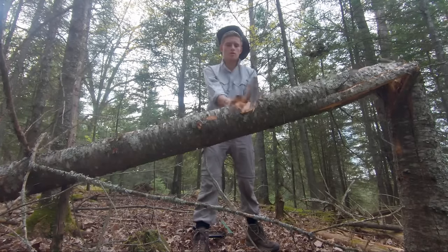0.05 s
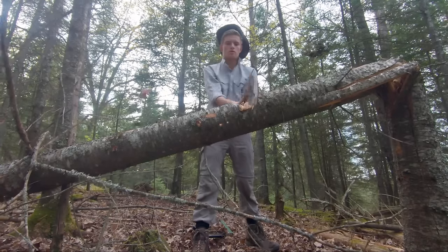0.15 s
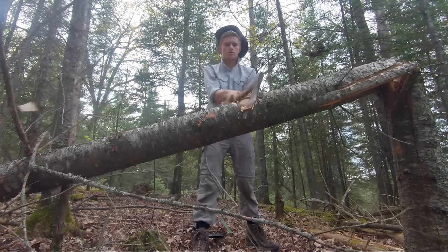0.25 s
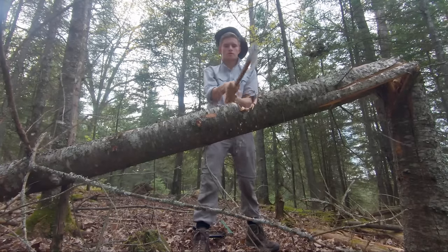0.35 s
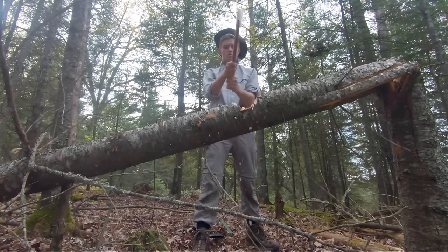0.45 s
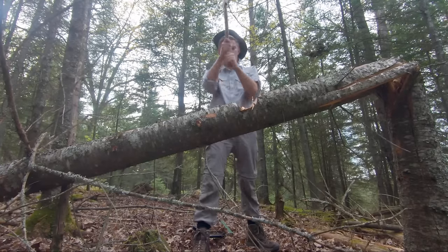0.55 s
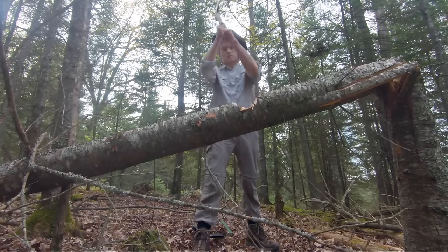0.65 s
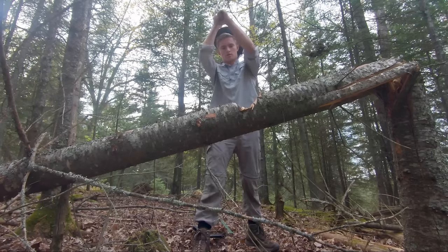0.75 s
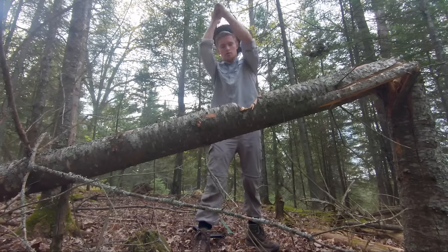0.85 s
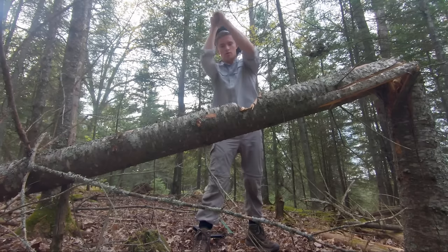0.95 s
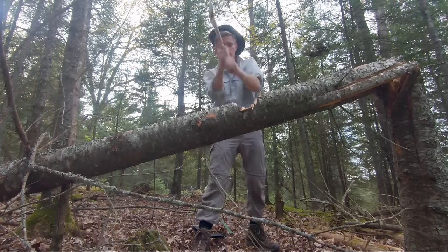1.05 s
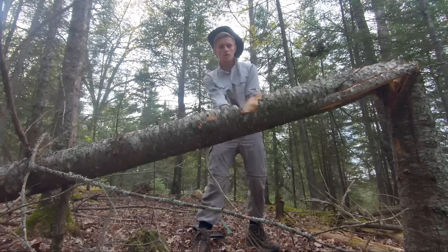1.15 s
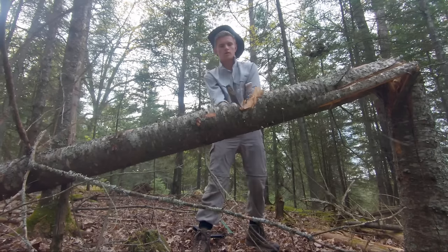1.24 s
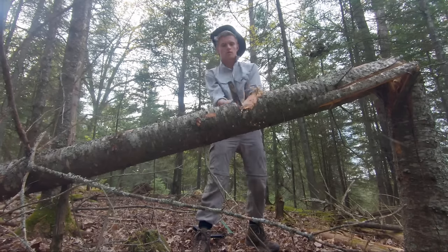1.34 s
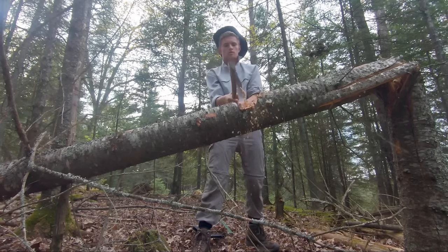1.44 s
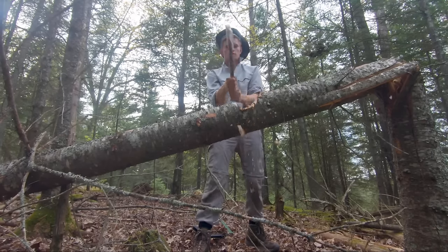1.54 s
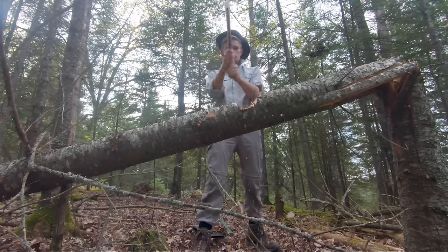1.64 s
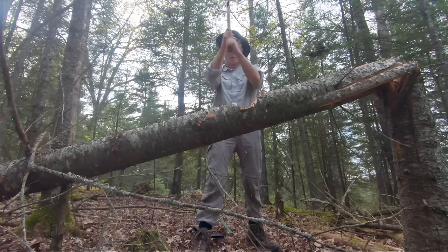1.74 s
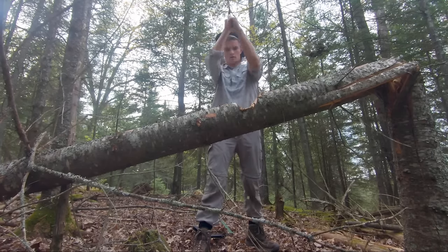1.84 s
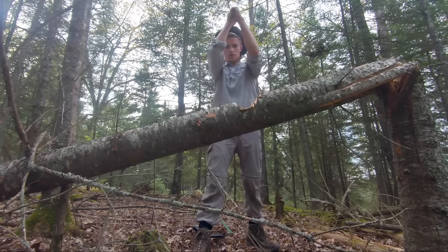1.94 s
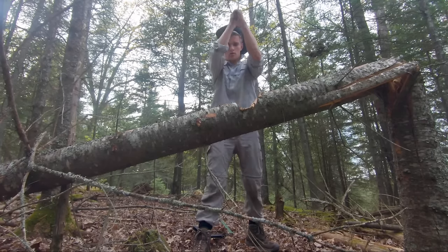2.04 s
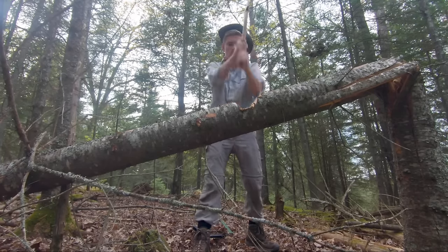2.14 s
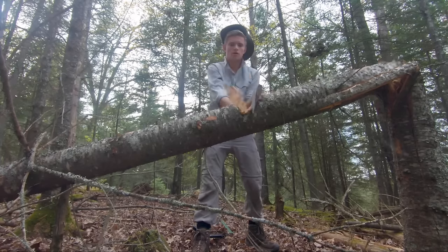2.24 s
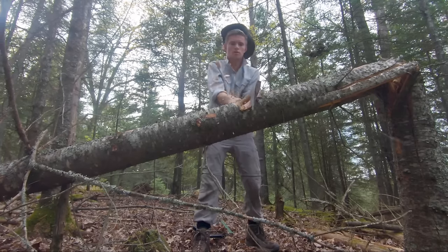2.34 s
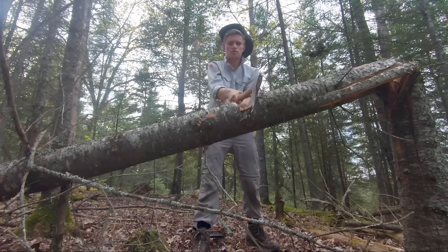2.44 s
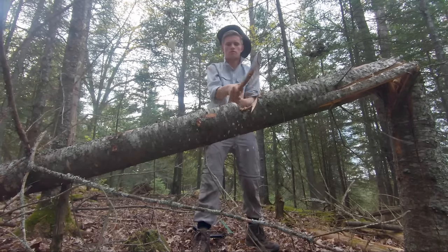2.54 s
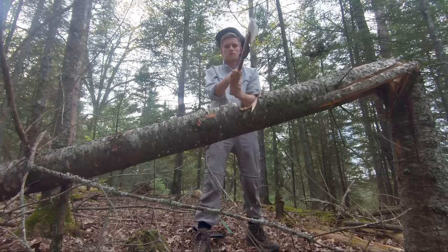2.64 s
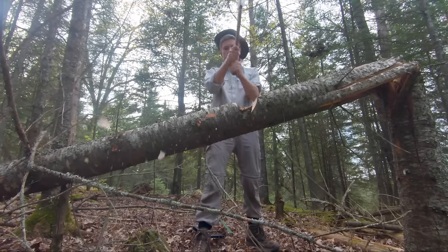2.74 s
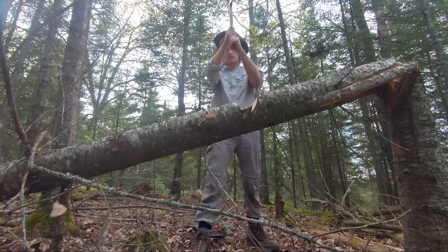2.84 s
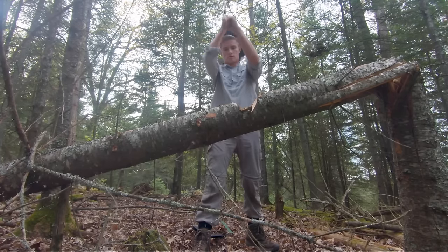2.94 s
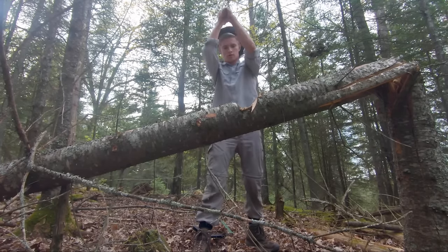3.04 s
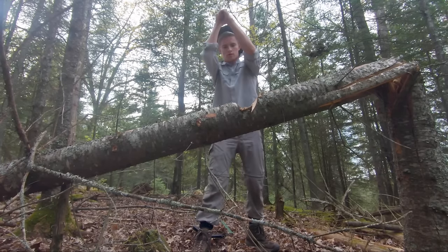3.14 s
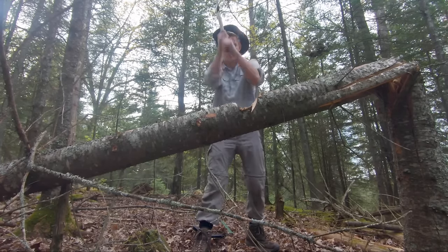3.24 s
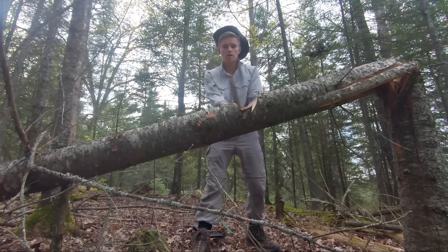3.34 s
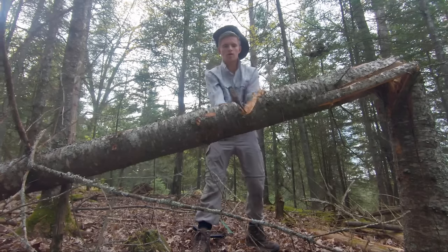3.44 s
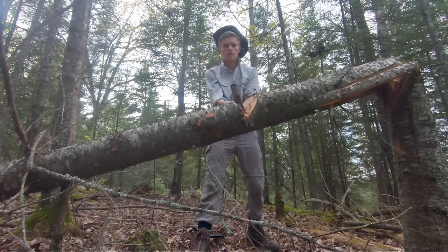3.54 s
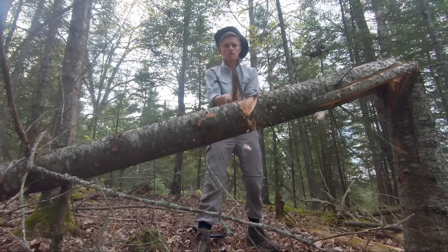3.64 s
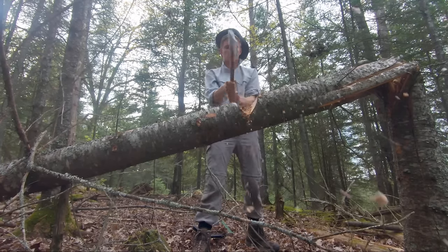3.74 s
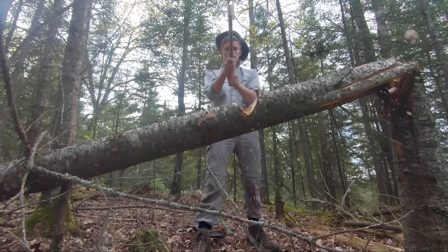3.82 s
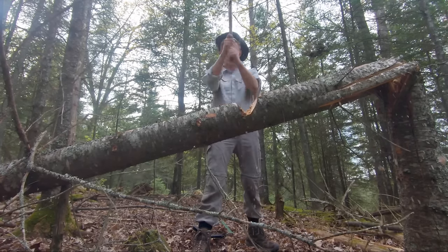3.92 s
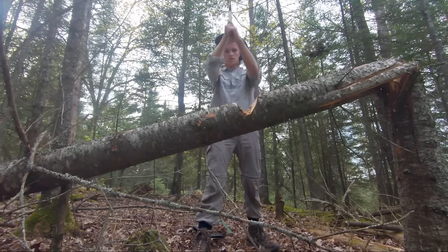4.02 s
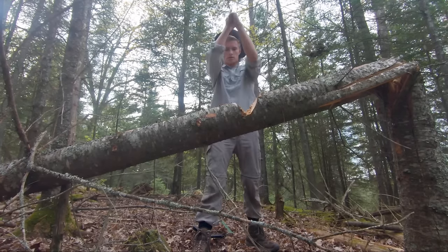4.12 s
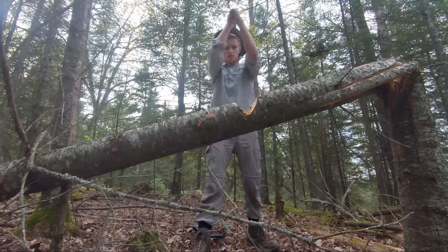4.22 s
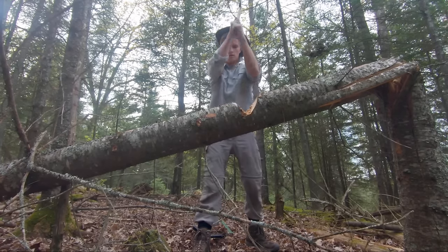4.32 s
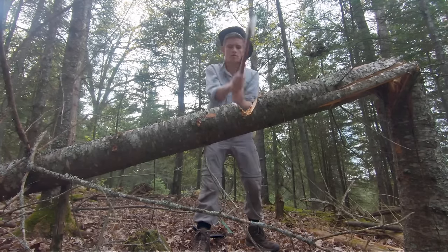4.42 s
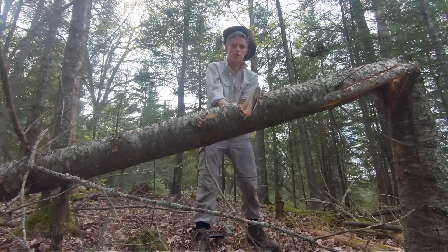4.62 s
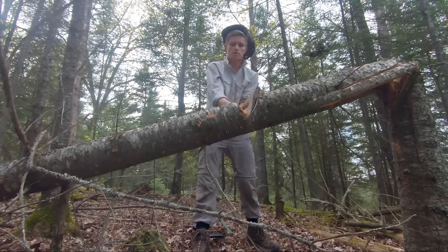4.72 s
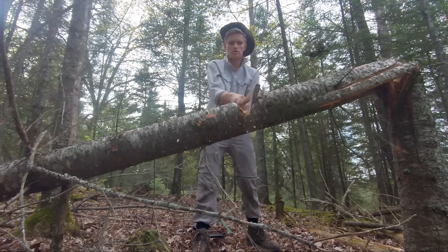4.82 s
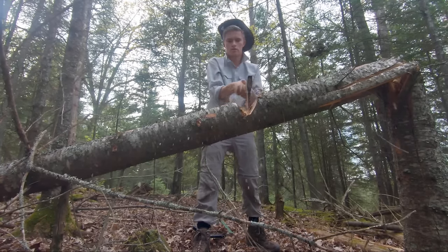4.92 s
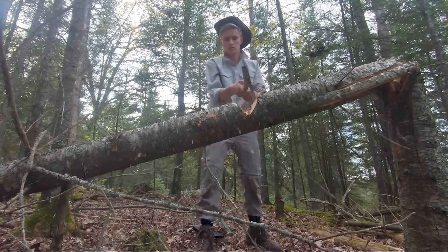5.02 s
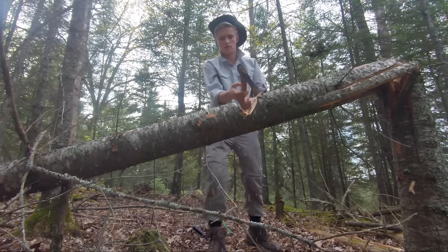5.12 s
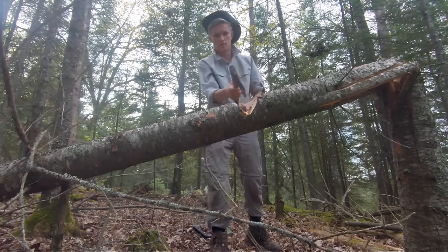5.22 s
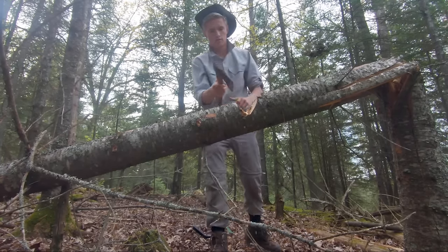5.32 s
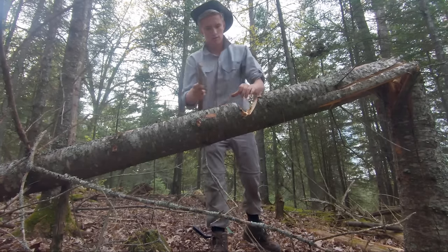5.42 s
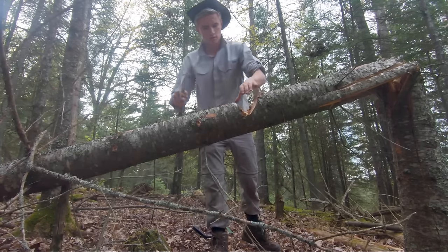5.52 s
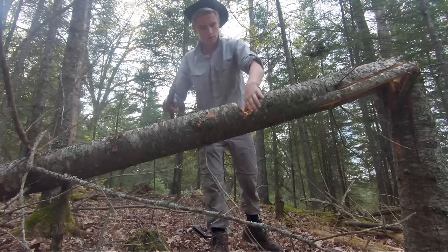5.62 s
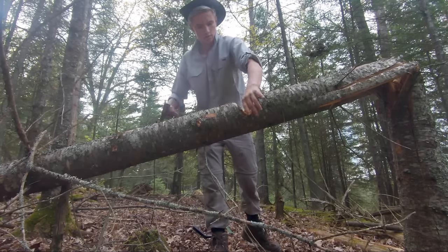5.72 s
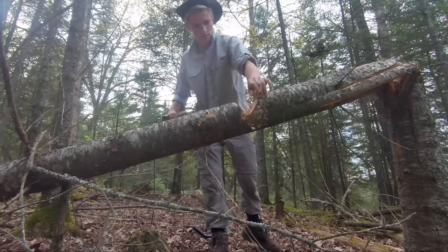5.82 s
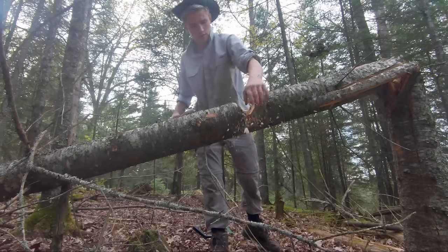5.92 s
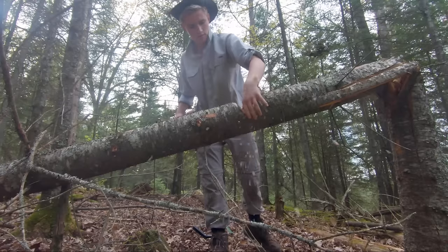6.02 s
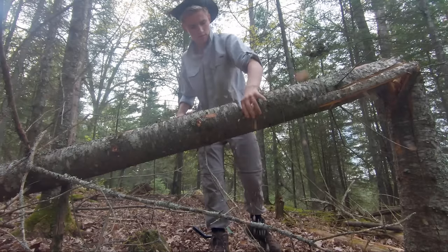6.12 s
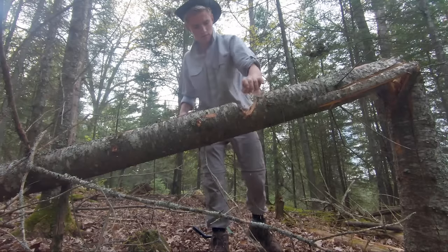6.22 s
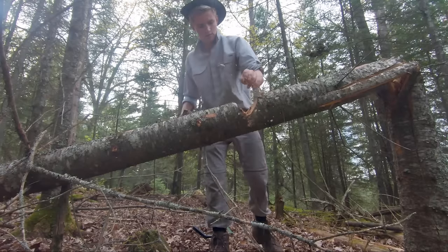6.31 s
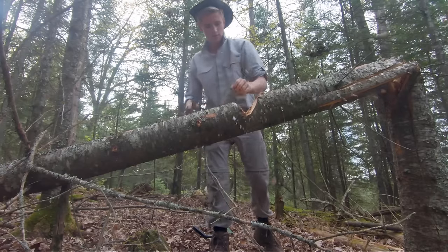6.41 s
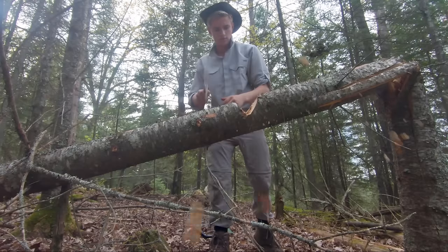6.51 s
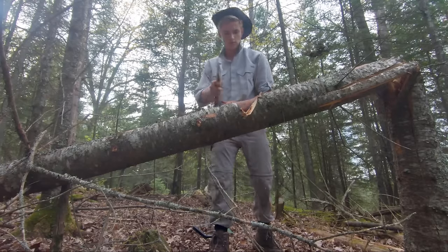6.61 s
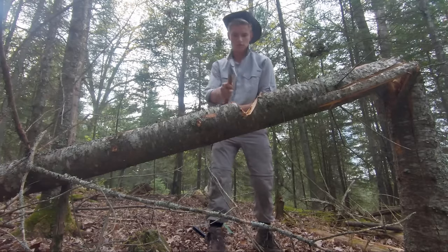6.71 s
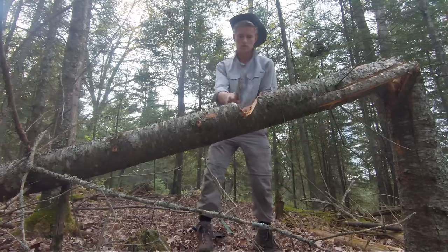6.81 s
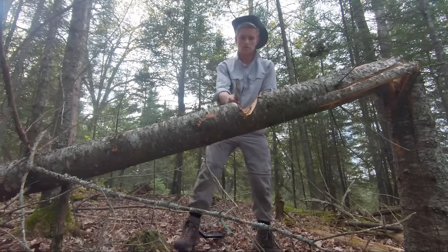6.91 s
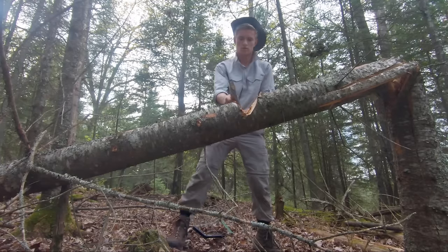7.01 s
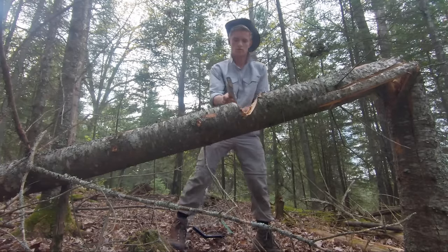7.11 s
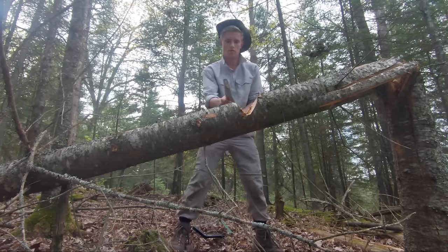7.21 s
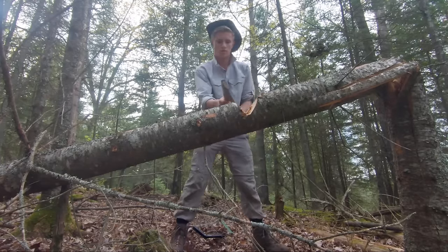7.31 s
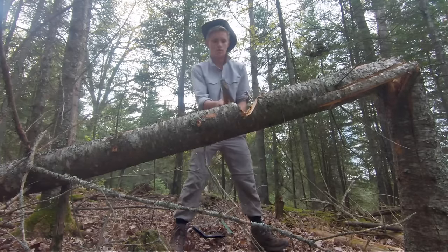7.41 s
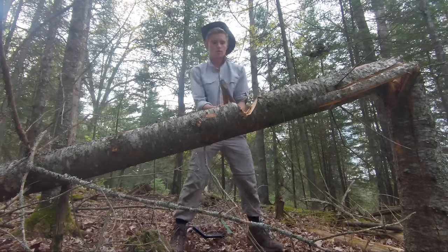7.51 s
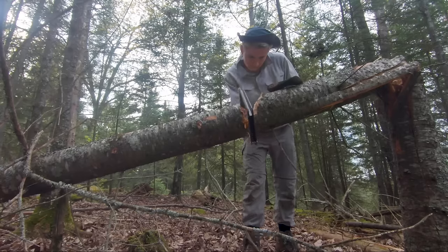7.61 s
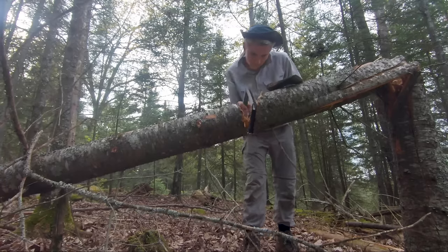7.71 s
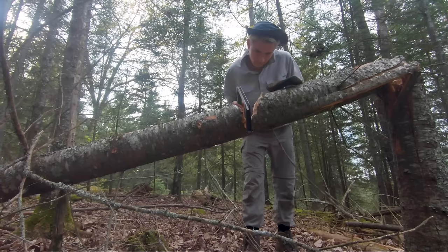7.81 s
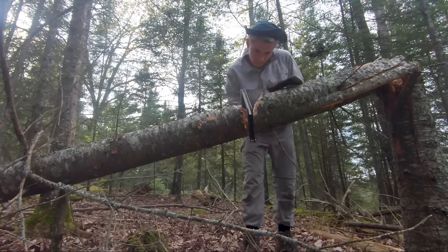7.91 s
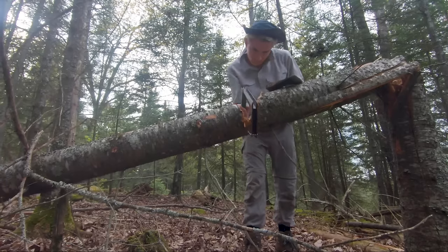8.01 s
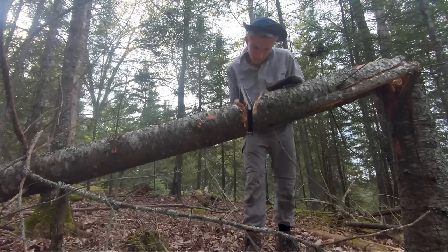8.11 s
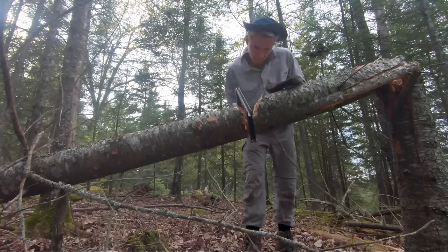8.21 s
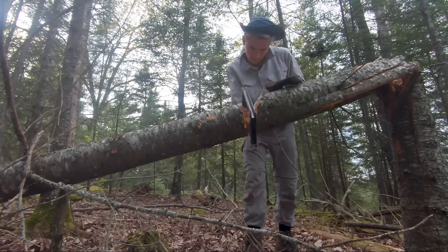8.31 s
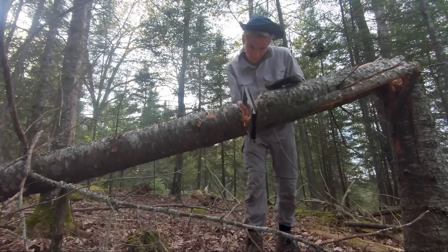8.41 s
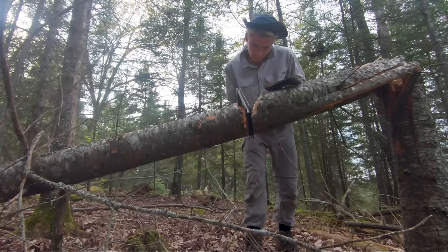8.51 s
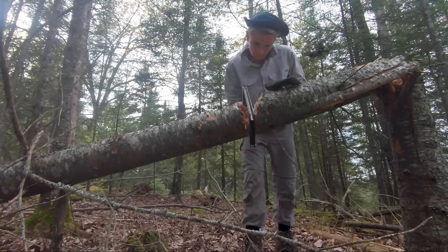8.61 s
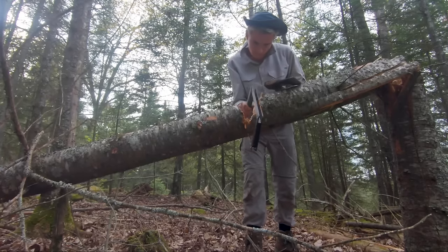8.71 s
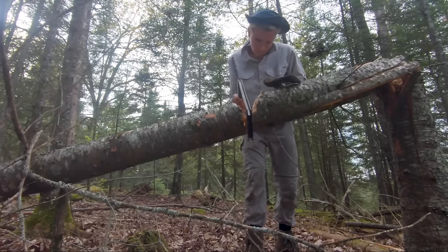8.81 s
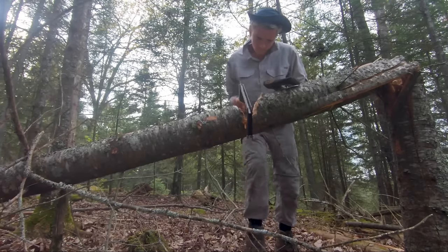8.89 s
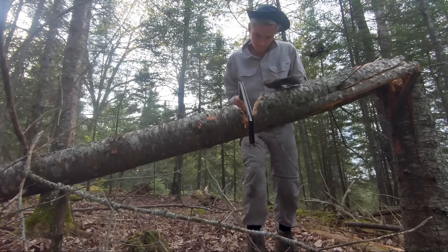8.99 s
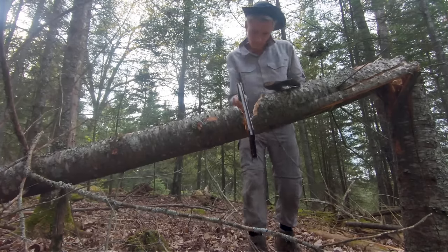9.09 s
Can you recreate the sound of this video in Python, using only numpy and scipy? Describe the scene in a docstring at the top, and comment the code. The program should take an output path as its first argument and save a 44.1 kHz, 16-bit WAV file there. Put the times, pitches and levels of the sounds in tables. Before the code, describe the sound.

A quiet forest with a soft airy hush and low wind rumble, puffing on the microphone now and then. At 0.1 s a hatchet bites into a fallen trunk with a bright, somewhat lighter crack; stronger, fuller chops follow at 1.2, 2.3, 3.4 and 4.5 s. Each is a sharp splintering hit with a hollow woody knock sinking into a low boom, then a brief diffuse echo among the trees. Chips tick and patter afterwards, and cloth and leaves rustle with the swings. A faint bird note sounds near 1 s. From 5 to 7.5 s there is only rustling, small ticks, light knocks at 6.3 and 6.9 s, a dry snap at 6.6 s and thin distant chirps. From 7.6 s to the end at about 9 s, a hand saw rasps in quick push-pull strokes, about five or six per second, gritty with slight blade ring and squeaks, over two faint knocks.

```python
"""A forest hush and a rumbling breeze come first; then a hatchet bites five times into a fallen trunk. Each
blow is torn-fibre noise through log resonances, a sinking knock and boom, and banded noise as echo. Two light
knocks follow. Chips tick as ringing noise bursts, cloth and leaves rustle as uneven noise, and a piece of wood
snaps as decaying sines. A hand saw starts on the cut: noise pulsed at a tooth rate; twice it catches in the cut
and jolts the log like a light knock. A far bird whistles in gliding sines, and puffs of low noise are wind on
the microphone."""
import sys
import numpy as np
from scipy import signal
from scipy.fft import rfft, irfft, next_fast_len
from scipy.io import wavfile
from scipy.ndimage import uniform_filter1d

SR = 44100
rng = np.random.default_rng(int(sys.argv[2]) if len(sys.argv) > 2 else 0)


def inscribe(sig):
    """Save sig as 16-bit PCM at rate SR to the path in sys.argv[1].

    A 1-D sig is mono; a 2-D sig holds one channel per row.
    Samples are clipped to [-1, 1] before scaling.
    """
    pcm = np.round(np.clip(np.atleast_2d(sig).T, -1, 1) * 32767)
    wavfile.write(sys.argv[1], SR, pcm.astype(np.int16))


N = 403515
TIME = np.arange(N) / SR   # seconds

# Far forest hush. Each row: frequency in Hz, relative density in dB per Hz.
HUSH_SPECTRUM = [(35, -20.5), (60, -10), (98, -1.5), (176, 7), (579, -18), (749, -8.5), (1010, -17),
                 (1860, -14.5), (2090, -24), (3760, -18.5), (10300, -26), (13900, -43.5), (16000, -59.5)]
# Wind noise on the microphone. Each row: frequency in Hz, relative density in dB per Hz.
WIND_SPECTRUM = [(15, -4.5), (35, -0.5), (55, -5.5), (90, -14), (180, -18.5), (400, -67)]
# Course of the breeze. Each row: time in seconds, relative level in dB.
BREEZE_COURSE = [(0.0, -52.5), (2.37, -44), (2.68, -61), (3.21, -56), (7.06, -65.5), (8.0, -71),
                 (9.15, -73)]
BREEZE_GAIN_DB, FLUTTER_DB, FLUTTER_PER_S = 1.5, 5.5, 19   # gain and random unsteadiness
# Single puffs of wind. Each row: start in seconds, length in seconds, relative level in dB.
WIND_PUFFS = [(1.857, .17, -33.5), (2.02, 0.18, -39), (2.836, 0.057, -32), (3.209, 0.096, -31.5),
              (4.401, 0.079, -34), (4.8, .1, -43.5), (5.987, .14, -35), (6.264, 0.062, -38.5),
              (7.02, 0.05, -41)]
# Bird notes. Each row: start in seconds, length in seconds, start pitch in Hz, end pitch in Hz, level in dB.
BIRD_NOTES = [(1.0, .15, 3900, 3880, -60), (6.475, .055, 5800, 4400, -56), (6.52, .085, 4400, 4200, -60),
              (6.8, .04, 3800, 3200, -54), (7.09, .03, 3800, 3300, -55), (7.125, .03, 3700, 3150, -54),
              (7.28, .06, 5000, 5500, -58), (7.44, .06, 5800, 4500, -56)]
# Arm swings, steps and scuffs that stir cloth and leaves. Each row: start in seconds, length in seconds,
# where it peaks (0-1), body level in dB, crispness level in dB.
MOVEMENTS = [(0.034, 0.11, 0.08, -53, -50.5), (0.613, 0.031, 0.3, -50, -43), (1.738, 0.56, 0, -49.5, -49),
             (2.691, 0.78, 0.26, -49, -51), (2.94, 0.043, 0.42, -39, -46), (3.523, 0.21, 0, -48.5, -43.5),
             (3.903, 0.058, .4, -43.5, -45), (3.93, 0.68, 0.26, -51, -49), (4.109, 0.093, 0.47, -45, -41.5),
             (5.026, .36, 0.71, -45.5, -47), (5.306, 0.46, 0.17, -56.5, -60.5),
             (5.73, .14, 0.91, -53, -70.5), (6.141, 0.22, 0.05, -49, -46.5), (6.311, .11, 0.87, -56, -49),
             (6.446, 0.17, 0.02, -67, -59), (6.671, 0.14, 0.28, -46.5, -42), (6.775, .33, 0.69, -51.5, -51),
             (7.158, 0.62, 0.1, -56.5, -55)]
# Soft body of the rustle. Each row: frequency in Hz, relative density in dB per Hz.
RUSTLE_BODY_SPECTRUM = [(180, -36), (300, -1), (437, -5), (904, 0), (1350, -3.5), (1970, -2), (3590, -1),
                        (6000, -14.5), (7800, -36), (13200, -120)]
# Crisp part of the rustle. Each row: frequency in Hz, relative density in dB per Hz.
RUSTLE_CRISP_SPECTRUM = [(2350, -40), (4000, -13), (7100, -12), (8650, -10.5), (13900, -20), (14900, -36),
                         (16000, -32.5)]
# Short bursts within the rustle: rate, decay time, size against the steady rub.
CRINKLES_PER_S, CRINKLE_S, CRINKLE_SIZE = 45, .003, 1.05
# Shower of fine chips after a blow: time to its peak, steepness of its swell, crispness against its body.
SHOWER_PEAK_S, SHOWER_POWER, SHOWER_CRISP_DB = .27, 1.39, -4.5
# Loudest chips landing and twigs cracking. Each row: time in seconds, relative peak in dB, centre in Hz.
CHIP_TICKS = [(0.327, -24, 800), (0.404, -25.5, 1850), (1.41, -27, 930), (2.234, -37, 3800),
              (2.391, -24, 2110), (2.736, -32, 2040), (2.907, -31, 2120), (3.026, -31, 3460),
              (3.242, -34.5, 2920), (3.915, -34, 2270), (3.994, -32, 950), (4.776, -32.5, 2170),
              (5.218, -33, 3800), (5.273, -27, 3650), (5.638, -40.5, 3200), (6.092, -42, 4480),
              (6.163, -32.5, 3210), (6.251, -30.5, 4300), (6.337, -39, 1280), (6.358, -39, 4000),
              (6.629, -31, 5060), (6.64, -31.5, 3240), (6.682, -29.5, 2520), (6.693, -28, 5800),
              (6.724, -23.5, 11430), (6.741, -27.5, 3400), (6.757, -29.5, 1450), (6.939, -36, 2720),
              (7.079, -35, 5100), (7.536, -41, 820), (8.397, -32, 1650)]
SNAP_S = 6.6127   # when a dry piece of wood snaps
# Modes of the snapping wood. Each row: frequency in Hz, level in dB, decay time to -60 dB in seconds.
SNAP_MODES = [(1210, -21, .044), (1400, -30, .015), (2600, -28, .004), (4100, -14, .003), (5600, -13, .003)]
# Saw strokes, push and pull in turn. Each row: start in seconds, end in seconds, relative level in dB,
# where the pressure peaks (0-1), treble in dB, blade ring in dB, log drone in dB.
SAW_STROKES = [(7.579, 7.674, -26.5, 0.24, -10, -5, -60), (7.681, 7.881, -33.5, 0.43, -6, -14, -67),
               (7.848, 8.022, -30.5, 0.65, -5, -0.5, -61), (8.059, 8.216, -38.5, 0.55, 1, -10, -70),
               (8.199, 8.385, -31.5, 0.61, -5, -8, -46), (8.42, 8.592, -36, 0.49, -5, -20, -59),
               (8.595, 8.749, -33, .65, -6.5, -3, -43), (8.807, 8.957, -30.5, 0.6, -4, -12, -52.5),
               (8.94, 9.16, -32.5, 0.6, -1.5, -5, -42)]
DRONE_SWELL_POWER = 0.17   # the log takes up the drone early in a stroke and holds it
# Sound of the cut. Each row: frequency in Hz, relative density in dB per Hz.
SAW_SPECTRUM = [(120, -31), (200, -4.5), (305, 1), (416, -12.5), (509, -10), (647, -16.5), (722, -12),
                (791, -11), (1230, -7), (2020, -8), (2750, -5.5), (4120, -12.5), (5130, -19), (11500, -25),
                (16000, -30)]
# Resonances of the saw blade. Each row: frequency in Hz, width in Hz, relative level in dB.
BLADE_MODES = [(732, 14, 0), (2692, 14, 14), (2950, 12, 5), (3210, 30, 4), (3670, 22, 0), (11280, 50, 13)]
# The blade chatters in the kerf. Each row: start in seconds, length in seconds, frequency in Hz, level in dB.
BLADE_CHATTER = [(7.599, 0.05, 4070, -36.5), (7.617, 0.047, 3180, -34.5), (8.468, 0.036, 5930, -42),
                 (8.483, 0.025, 7940, -42.5), (8.869, 0.053, 640, -35.5)]
# Blows on the trunk: five chops, two light knocks, then two catches of the saw in the cut. # Each row: time in
# seconds, crack in dB, # bite length in seconds, treble in dB, hollowness in dB, chip shower in dB, knock in
# dB, # starting knock pitch in Hz, knock swell in seconds, boom in dB; all levels are relative.
TRUNK_BLOWS = [(0.1144, -22.5, 0.0051, 16, -3.5, -47.5, -6.5, 325, 0.008, -24.5),
               (1.2076, -11.5, 0.0047, -6, 0, -49, -11.5, 316, 0.013, -20),
               (2.294, -12.5, 0.0039, 5, 2, -52, -12.5, 346, 0.019, -22.5),
               (3.4194, -12, 0.0046, -5.5, -1, -49, -11, 301, 0.015, -21.5),
               (4.5465, -16.5, .004, 1, 5, -56, -2.5, 310, .009, -24),
               (6.269, -37.5, 0.0034, 6.5, -15.5, -62, -41, 261.6, 0.0063, -47),
               (6.893, -35, 0.0088, 3.5, 2, -59, -27, 385, 0.0054, -33),
               (8.214, -31.5, 0.0018, -20, 2, -56.5, -58, 298, 0.012, -57),
               (8.792, -36, 0.02, -5.5, 1, -54.5, -51, 297, 0.01, -58)]
# Wood splitting as the blade goes in, or a chip breaking off just after.
# Each row: time in seconds, relative level in dB.
WOOD_SPLITS = [(0.1324, -17.5), (1.2277, -18.5), (2.282, -36), (2.3023, -25), (3.4398, -16), (4.539, -22.5),
               (4.543, -16), (4.5625, -22.5)]
# Sound of the crack. Each row: frequency in Hz, relative density in dB per Hz.
CRACK_SPECTRUM = [(260, -18), (450, -5), (538, -9), (759, -7.5), (2190, -9.5), (2470, -14), (3230, -13.5),
                  (4990, -17.5), (5790, -17.5), (7930, -26), (9770, -25), (13600, -47), (16000, -60.5)]
# Resonances of the log. Each row: frequency in Hz, width in Hz, level in dB.
LOG_MODES = [(533, 21, 5), (750, 24, 1.3), (916, 20, 3.2), (1173, 45, 2.2), (1560, 18, 2.9), (2027, 27, 1),
             (2530, 210, 4.6), (2854, 22, 3.7), (3060, 240, 1.6), (5360, 34, 1.8), (5880, 27, 1.7)]
# Forest echo. Each row: frequency in Hz, relative level in dB, decay time to -60 dB in seconds.
FOREST_ECHO = [(54.3, -6.5, 1), (95, 2.5, 1), (159, -5, 1), (202, -17, 0.66), (270, -19.5, 0.65),
               (560, -10.5, 1), (1000, -5.5, 1.0), (2550, -6.5, 0.9), (4970, -9, 1), (12000, -4.5, 1)]
# Lead of the left microphone port over the right. Each row: frequency in Hz, phase in radians.
PORT_LEAD = [(0, 0), (380, 0.22), (750, 1.24), (1150, 0.47), (1600, 0.78), (2200, -0.1), (6000, 0.2),
             (8000, 2.5), (9500, 4), (16000, 5.5)]
# Noise suppressor: acts above this pitch, below this level, by at most this much, in dB per dB.
SUPPRESS_ABOVE_HZ, SUPPRESS_BELOW_DB, SUPPRESS_DEPTH_DB, SUPPRESS_SLOPE = 400, -56, 5, 1.0
CUTOFF_HZ = 15800
LEFT_RIGHT = np.array([[1], [-1]])   # opposite signs for the two channels


def from_db(db):
    """Level law: 20 dB is a tenfold amplitude."""
    return 10 ** (np.asarray(db) / 20)


def rms_one(x):
    """Normalisation to unit root-mean-square."""
    return x / np.sqrt(np.mean(x ** 2) + 1e-20)


def at_hz(points, hz, axis=1):
    """Interpolation of a table column along a logarithmic frequency axis."""
    points = np.array(points)
    return np.interp(np.log(hz + 1e-9), np.log(points[:, 0]), points[:, axis])


def cut(x, hz, kind, order=2):
    """Butterworth filtering: a maximally flat passband."""
    sections = signal.butter(order, np.clip(hz, 10, .45 * SR), kind, fs=SR, output="sos")
    return signal.sosfilt(sections, x + 1e-18)


def colour(x, spectrum, size=8192):
    """Minimum-phase filtering by a folded cepstrum; white noise keeps its power."""
    hz = np.arange(size // 2 + 1) * SR / size
    cepstrum = irfft(np.log(from_db(at_hz(spectrum, hz))))
    causal = 2 * cepstrum[:size // 2] * (np.arange(size // 2) > 0)
    response = irfft(np.exp(rfft(causal, size)))
    return signal.oaconvolve(x, response[None] / np.linalg.norm(response))[:, :N]


def resonate(x, hz, width):
    """Damped resonance: a pole pair with gain near 1 at its top."""
    r = np.exp(-np.pi * width / SR)
    zeros = np.array([1, 0, -1]) * (1 - r * r) / 2
    poles = [1, -2 * r * np.cos(2 * np.pi * hz / SR), r * r]
    return signal.lfilter(zeros, poles, x + 1e-18)


def glide(pitch):
    """Frequency modulation: phase is the running sum of a pitch in Hz."""
    return np.sin(2 * np.pi * np.cumsum(pitch) / SR)


def add(out, s, sound):
    """Superposition of a short sound at time s."""
    start = max(round(s * SR), 0)
    out[:, start:start + sound.shape[-1]] += sound[..., :max(N - start, 0)]


def drift(per_s):
    """Random fluctuation: straight lines between normal values drawn per_s times a second."""
    knots = np.arange(0, N / SR + 1, 1 / per_s)
    return np.interp(TIME, knots, rng.standard_normal(len(knots)))


def stereo_noise(apart_hz, spread, size=N):
    """Partial coherence: white noise whose channels differ more above apart_hz."""
    mid, side = rng.standard_normal((2, size))
    width = np.sqrt(np.clip(spread, 0, 1))
    lowpass = signal.butter(2, min(apart_hz, .45 * SR), fs=SR, output="sos")
    high_side = side - signal.sosfiltfilt(lowpass, side)
    return mid + (width * side + (1 - width) * high_side) * LEFT_RIGHT


def grains(per_s, spread_db):
    """Shot process: random clicks of uneven size, as a gain of unit rms."""
    sizes = from_db(spread_db * np.minimum(rng.exponential(1, N), 5))
    sizes = sizes * (rng.random(N) < per_s / SR)
    return rms_one(uniform_filter1d(sizes, size=24))


def swell(t, peak_s, power):
    """Gamma-shaped envelope: rises to 1 at peak_s and dies away."""
    return (t / peak_s * np.exp(1 - t / peak_s)) ** power


def progress_of(start, end, peak_at):
    """Time warping: runs from 0 to 1 and passes one half where the movement peaks."""
    peak = start + np.clip(peak_at, .05, .95) * (end - start)
    return np.interp(TIME, [start, peak, end], [0, .5, 1])


def arch(progress):
    """Half-sine motion: rises and falls once over a movement."""
    return np.sin(np.pi * progress).clip(0)


def outdoors():
    """Turbulence: wind rumbles separately in each port, over a far diffuse hush."""
    hush = from_db(-57.0) * rms_one(colour(stereo_noise(apart_hz=3044, spread=0.9), HUSH_SPECTRUM))
    course_db = np.interp(TIME, *np.transpose(BREEZE_COURSE))
    breeze = from_db(course_db + BREEZE_GAIN_DB + FLUTTER_DB * drift(FLUTTER_PER_S))
    puffs = sum(from_db(db) * arch(progress_of(start, start + length, .5)) for start, length, db in WIND_PUFFS)
    rumble = rms_one(colour(rng.standard_normal((2, N)), WIND_SPECTRUM))
    return hush + np.hypot(breeze, puffs) * rumble * from_db([[3.5], [-10]])


def bird():
    """Whistled tones: thin sines glide in pitch and level out."""
    out = np.zeros((2, N))
    for s, length, start_hz, end_hz, db in BIRD_NOTES:
        u = np.linspace(0, 1, int(length * SR))
        pitch = end_hz + (start_hz - end_hz) * (1 - u) ** 2
        waver = from_db(3 * drift(120)[:len(u)] - 3)
        add(out, s, from_db(db) * waver * glide(pitch) * np.abs(np.sin(np.pi * u)))
    return out


def stirring():
    """Power addition: movements and chip showers combine into gains of body and crispness."""
    shower = 0
    for s, _, _, _, _, shower_db, *_ in TRUNK_BLOWS:
        envelope = swell((TIME - s).clip(0), SHOWER_PEAK_S, SHOWER_POWER)
        shower = shower + (from_db(shower_db) * envelope) ** 2
    body, crisp = shower, shower * from_db(SHOWER_CRISP_DB) ** 2
    for start, length, peak_at, body_db, crisp_db in MOVEMENTS:
        speed = arch(progress_of(start, start + length, peak_at))
        body = body + (from_db(body_db) * speed) ** 2
        crisp = crisp + (from_db(crisp_db) * speed) ** 2
    return np.sqrt(body), np.sqrt(crisp)


def crinkles():
    """Stick and slip: leaves and cloth catch and let go in uneven bursts, as a gain of unit rms."""
    bursts = (rng.random(N) < CRINKLES_PER_S / SR) * np.minimum(rng.exponential(1, N), 3)
    bursts = signal.lfilter([1], [1, -np.exp(-1 / (CRINKLE_S * SR))], bursts + 1e-18)
    return rms_one((1 + CRINKLE_SIZE * bursts) * from_db(1.5 * drift(35)))


def rustle(body_gain, crisp_gain):
    """Friction noise: cloth and leaves rub in a soft hiss, with crisp grains of dry leaf on top."""
    body = stereo_noise(apart_hz=6000, spread=0.34) * (3.0 + 0.3 * grains(per_s=150, spread_db=5.5))
    body = body * from_db(1.1 * drift(60))
    crisp = stereo_noise(apart_hz=5000, spread=0.55) * (6 + 0.22 * grains(per_s=400, spread_db=5.5))
    crisp = crisp * from_db(2.7 * drift(70))
    body = body_gain * rms_one(colour(body, RUSTLE_BODY_SPECTRUM))
    crisp = crisp_gain * rms_one(colour(crisp, RUSTLE_CRISP_SPECTRUM))
    return crinkles() * (body * from_db(1.1 * LEFT_RIGHT) + crisp)


def litter(body_gain, crisp_gain):
    """Random impacts: bits of bark and dry leaf patter in seven bands where the rustle is strong."""
    out = 0
    for hz in np.geomspace(1500, 10000, 7):
        clicks = (rng.random(N) < 26 / SR) * from_db(2.2 * np.minimum(rng.exponential(1, N), 3))
        ticks = rms_one(cut(clicks, [hz / 1.2, hz * 1.125], "band"))
        gain = body_gain if hz < 4500 else crisp_gain
        out = out + ticks * gain * from_db(rng.normal(0, 4.6) * LEFT_RIGHT)   # each band has its own side
    return from_db(-13) * out


def clack(hz):
    """Struck resonator: a chip of wood ticks around hz and rings briefly; its channel mean peaks at 1."""
    t = TIME[:SR // 16]
    decay = np.exp(-t / 0.0024) + from_db(-12.0) * np.exp(-t / 0.0072)
    contact = stereo_noise(apart_hz=6000, spread=.25, size=len(t)) * decay
    tick = resonate(contact, hz, .7 * hz) + 2.6 * resonate(contact, hz, .055 * hz)
    return tick / np.abs(tick.mean(axis=0)).max()


def twigs():
    """Impact and modal decay: chips and twigs tick, every blow scatters bits, one piece snaps and rings."""
    out, t = np.zeros((2, N)), TIME[:SR // 10]
    for s, db, hz in CHIP_TICKS:
        add(out, s, from_db(db + 1.0) * clack(hz))
    for s, crack_db, *_ in TRUNK_BLOWS:
        for flight, pitch, side in rng.random((9, 3)):
            flight_s = .04 + .45 * flight ** 1.5
            db = crack_db - 13 - 26 * flight_s + 8 * (side - .5) * LEFT_RIGHT   # later bits are fainter
            add(out, s + flight_s, from_db(db) * clack(900 * 7 ** pitch))
    snap = sum(from_db(db - 60 * t / t60) * np.sin(2 * np.pi * hz * t) for hz, db, t60 in SNAP_MODES)
    add(out, SNAP_S, snap)
    return out


def chatter():
    """Narrow-band noise: short rough squeaks as the saw binds."""
    out = np.zeros((2, N))
    for s, length, hz, db in BLADE_CHATTER:
        size = int(length * SR)
        squeak = rms_one(resonate(stereo_noise(apart_hz=5950, spread=0.064, size=size), hz, 0.079 * hz))
        add(out, s, from_db(db) * squeak * np.sin(np.linspace(0, np.pi, size)))
    return out


def saw():
    """Periodic tearing: teeth rip fibres at a rate that follows the stroke; the blade rings more late in it."""
    force, treble, ringing, speed, shaking = np.zeros((5, N))
    for start, end, db, peak_at, treble_db, ring_db, drone_db in SAW_STROKES:
        progress = progress_of(start, end, peak_at)
        arc = arch(progress)
        press = from_db(db) * arc ** 1.25
        force, speed = force + press, np.maximum(speed, arc)
        treble = treble + press * (from_db(treble_db) - 1)
        ringing = ringing + 2 * progress * press * from_db(ring_db)
        shaking = shaking + from_db(drone_db) * arc ** DRONE_SWELL_POWER
    tooth_hz = 260 * np.sqrt(speed) * from_db(1.8 * drift(90))
    teeth = np.cumsum(tooth_hz) / SR % 1   # position within one tooth
    bite = (.6 + np.exp(-teeth / .22)) * from_db(1.5 * drift(220))
    rip = stereo_noise(apart_hz=6400, spread=0.055) * rms_one(bite)
    # fibre bundles of every size tear with their own fluctuation
    splinters = sum(resonate(rip, hz, .16 * hz) * from_db(5 * drift(80)) for hz in np.geomspace(500, 8000, 14))
    rip = colour(rms_one(0.49 * rip + splinters), SAW_SPECTRUM)
    wood = rip * force + cut(rip * treble, 3900, "high", order=1)
    blade = sum(from_db(db) * resonate(rip * ringing, hz, width) for hz, width, db in BLADE_MODES)
    drone = rms_one(cut(stereo_noise(apart_hz=6000, spread=0.51), [85, 170], "band", order=3))
    return from_db(0.5) * (wood + blade) + drone * shaking * from_db([[-10], [4]])


def trunk():
    """Dispersion: low bending waves travel slowest along the log, so the knock sinks into an uneven boom."""
    out, t = np.zeros((2, N)), TIME[:SR // 2]
    for s, *_, knock_db, knock_hz, swell_s, boom_db in TRUNK_BLOWS:
        knock_pitch = knock_hz / (1 + (t / 0.033) ** 2) ** .5 * (1 + 0.095 * drift(220)[:len(t)])
        knock = glide(knock_pitch) * swell(t, swell_s, power=2.3)
        knock = knock / (1 + (t / (swell_s + 0.024)) ** 8)   # the wedged blade damps the knock
        thud = rms_one(cut(rng.standard_normal(len(t)), [170, 520], "band"))
        thud = thud * swell(t, 0.0063, power=.9)   # the wood round the cut
        overtone = np.sin(2 * np.pi * 547 * t) * swell(t, 0.0056, power=0.45)
        knock = knock + from_db(-16.5) * thud + from_db(-24.5) * overtone
        boom_pitch = (78 + 150 * np.exp(-t / .033)) * (1 + 0.14 * drift(70)[:len(t)])
        boom = glide(boom_pitch) * swell(t, .022, power=0.56) * from_db(1.5 * drift(98)[:len(t)])
        sway = rms_one(cut(rng.standard_normal(len(t)), [25, 85], "band"))
        sway = sway * swell(t, 0.021, power=1.8)   # the whole log rocks
        add(out, s, from_db(knock_db) * knock + from_db(boom_db) * (boom + from_db(-6.5) * sway))
    return out * from_db([[-1.3], [1.3]])


def cracks():
    """Fracture and resonance: fibres tear for milliseconds as the blade wedges in; the log rings on."""
    out, t = np.zeros((2, N)), TIME[:SR // 10]
    for s, db, bite_s, treble_db, hollow_db, *_ in TRUNK_BLOWS:
        tear = stereo_noise(apart_hz=7000, spread=0.15, size=len(t))
        tear = tear * (np.exp(-(t / bite_s) ** 2) + from_db(-17.5) * np.exp(-t / 0.021))
        tear = tear + (from_db(treble_db) - 1) * resonate(tear, 6000, 4500)   # a glancing cut is brighter
        tear = tear + (from_db(hollow_db) - 1) * resonate(tear, 570, 1100)   # a deep one sounds hollower
        add(out, s, from_db(db) * tear)
    for s, db in WOOD_SPLITS:
        split = stereo_noise(apart_hz=7000, spread=0.053, size=len(t)) * np.exp(-t / 0.0023)
        add(out, s, from_db(db) * split)
    out = colour(out, CRACK_SPECTRUM)
    return out + sum(from_db(db) * resonate(out, hz, width) for hz, width, db in LOG_MODES)


def forest(x):
    """Diffuse scattering: trunks return a lumpy cloud of sound that dies away band by band."""
    echo, lumps = 0, rms_one(from_db(3.4 * drift(90)))
    crackle = rms_one(1.5 + 0.36 * grains(per_s=250, spread_db=4.0))
    scatter = [stereo_noise(apart_hz=4500, spread=0.67) * lumps * crackle for _ in range(2)]
    rumble = rng.standard_normal((2, N))   # the lowest echoes differ between the two ports
    edges, source = np.geomspace(45, 16000, 15), x.mean(axis=0)
    for k, (low, high) in enumerate(zip(edges, edges[1:])):
        hz = np.sqrt(low * high)
        power = cut(source, [low, high], "band") ** 2
        energy_fade_s = at_hz(FOREST_ECHO, hz, axis=2) / np.log(1e6)
        for fade_s in (energy_fade_s, .022):   # energy builds up, then leaks away
            keep = np.exp(-1 / (fade_s * SR))
            power = signal.lfilter([1 - keep], [1, -keep], power + 1e-18)
        noise = rms_one(cut(scatter[k % 2] if hz > 150 else rumble, [low, high], "band"))
        # the boom comes back from the right, the crack from the left
        pan = from_db(np.interp(hz, [140, 700], [-3.5, 1.6]) * LEFT_RIGHT)
        echo = echo + from_db(at_hz(FOREST_ECHO, hz) - 3.5) * np.sqrt(power) * noise * pan
    return echo


def ports(x):
    """Interchannel phase: two ports in a small body hear the same sound with a phase between them."""
    hz, radians = np.transpose(PORT_LEAD)
    size = next_fast_len(N + 4096)
    lead = np.interp(np.arange(size // 2 + 1) * SR / size, hz, radians)
    return irfft(rfft(x, size) * np.exp(.5j * lead * LEFT_RIGHT), size)[:, :N]


def suppress(x):
    """Downward expansion: the treble is turned down further whenever it falls quiet."""
    highpass = signal.butter(2, SUPPRESS_ABOVE_HZ, "high", fs=SR, output="sos")
    treble = signal.sosfiltfilt(highpass, x)
    power = uniform_filter1d((treble ** 2).mean(axis=0), size=600)
    level_db = 10 * np.log10(power.clip(1e-12))
    loss_db = np.clip(SUPPRESS_SLOPE * (SUPPRESS_BELOW_DB - level_db), 0, SUPPRESS_DEPTH_DB)
    return x + (from_db(-loss_db) - 1) * treble


def scene():
    """Superposition: surroundings, small sounds dulled by distance, and the blows with their echo."""
    stirred = stirring()
    leaves = cut(rustle(*stirred) + litter(*stirred), 10000, "low")
    small = cut(twigs(), 11000, "low") + saw() + chatter()
    blows = cracks() + trunk()
    echo = forest(blows + from_db(-7.0) * small)
    return outdoors() + bird() + leaves + small + blows + echo


def record(dry):
    """Transduction: through ports and suppressor; peaks beyond full scale clip and the top is cut."""
    heard = np.clip(suppress(ports(dry)), -1, 1)
    return signal.sosfilt(signal.ellip(10, .1, 80, CUTOFF_HZ, fs=SR, output="sos"), heard)


dry = scene()
out = record(dry)
inscribe(out)
```